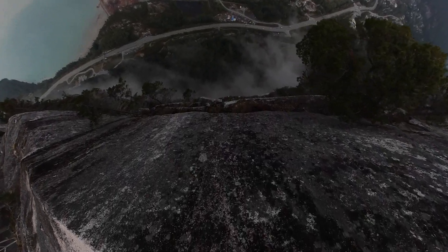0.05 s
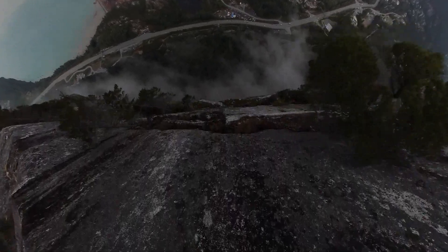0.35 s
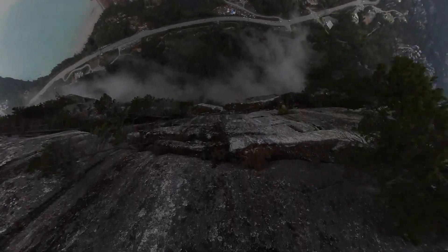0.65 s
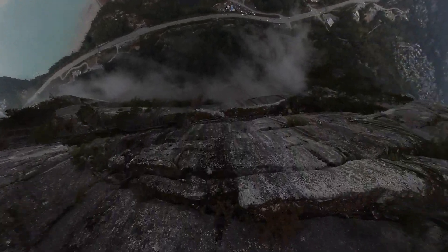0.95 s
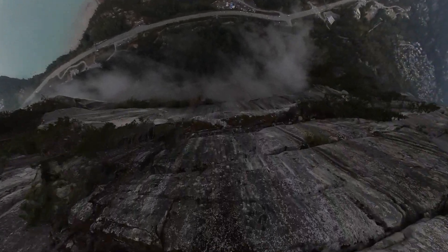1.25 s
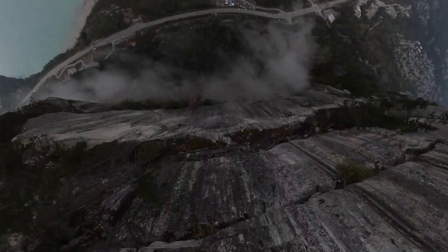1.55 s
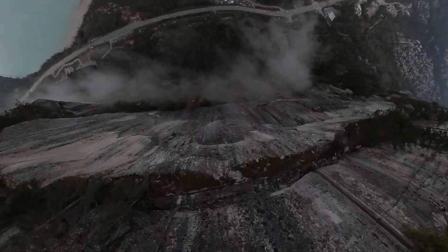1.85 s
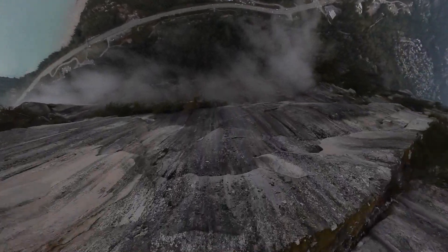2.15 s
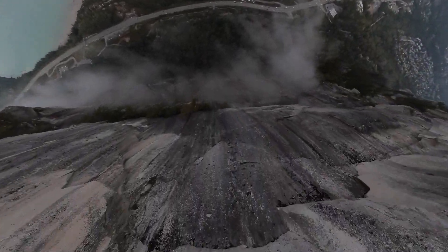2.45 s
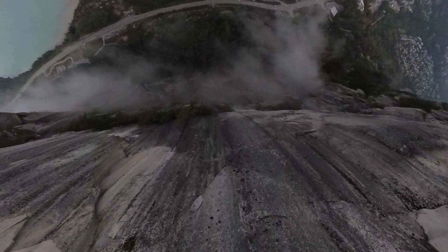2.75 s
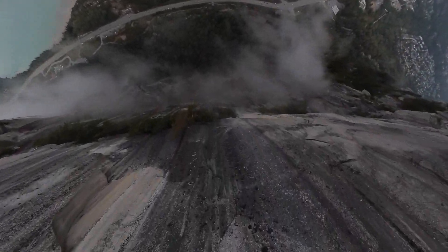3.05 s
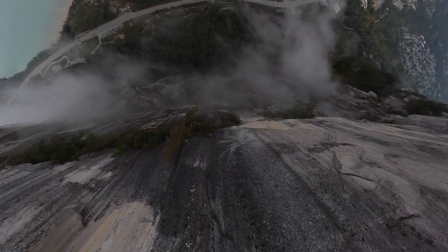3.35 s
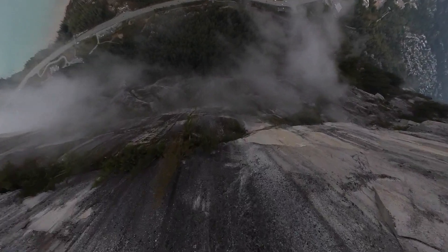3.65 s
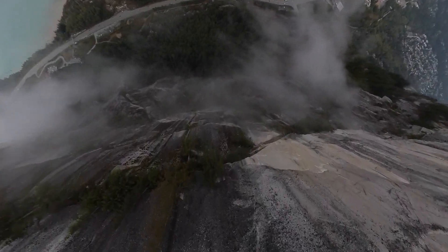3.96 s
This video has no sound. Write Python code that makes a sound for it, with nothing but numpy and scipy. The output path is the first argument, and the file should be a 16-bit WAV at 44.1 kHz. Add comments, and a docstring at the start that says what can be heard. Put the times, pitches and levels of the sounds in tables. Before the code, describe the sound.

Strong wind buffeting the microphone in fast flight down a cliff, with a few early clicks.

```python
"""Wind buffets a camera in fast flight down a cliff: eddies strike the ports, the air rushes and hisses.
Early on the mount knocks and ticks, and one falling swish sweeps by. The camera then folds the wind
to mono, and its limiter presses the rumble flat. Later, eddy shedding adds a wavering drone, the hiss
dies away, and a faint rustle and a rattle of gear lie under the wind."""
import sys
import numpy as np
from scipy import signal
from scipy.fft import rfft, irfft
from scipy.io import wavfile
from scipy.ndimage import uniform_filter1d, minimum_filter1d

SR = 44100
rng = np.random.default_rng(int(sys.argv[2]) if len(sys.argv) > 2 else 0)


def master_out(mix):
    """Clip the mix to full scale and print it as 16-bit PCM to the path in sys.argv[1]."""
    frames = np.transpose(np.atleast_2d(mix))
    ceiling = np.clip(frames, -1, 1)
    pcm = np.round(ceiling * 32767).astype(np.int16)
    wavfile.write(sys.argv[1], SR, pcm)


N = 176400
T = np.arange(N) / SR

# Envelopes of the low buffeting, the rush and the rasp near 1 kHz (time [s], level [dB])
BUFFET_ENVELOPE = [(0, -39), (.03, -33), (.47, -28), (.5, -20), (.61, -27.5), (.77, -14), (.82, -29.5),
                   (.87, -18), (1.05, -20.5), (1.6, -22), (1.93, -25), (2.3, -24.5), (2.6, -23.5),
                   (3.3, -22), (4, -19.5)]
RUSH_ENVELOPE = [(0, -47), (.03, -30.5), (.09, -35.5), (.21, -29), (.25, -35.5), (.29, -34), (.34, -32.5),
                 (.47, -32.5), (.53, -24.5), (.62, -25), (.76, -20.5), (.95, -19), (1.25, -23),
                 (1.6, -29.5), (2.4, -34), (3.1, -32), (3.6, -27.5), (4, -28)]
RASP_ENVELOPE = [(0, -48), (.1, -43.5), (.25, -44.5), (.48, -33), (.55, -35), (.6, -29), (.66, -24.5),
                 (.72, -34), (.78, -30), (.85, -35.5), (1.2, -38.5), (1.6, -40), (2.0, -39), (2.45, -41),
                 (2.48, -48), (2.56, -41.5), (2.8, -45.5), (3.0, -58), (4, -63)]
# Their spectra (frequency [Hz], relative level [dB])
BUFFET_SPECTRUM = [(20, -22), (38, -25.5), (60, -14.5), (90, 1), (125, 3.5), (165, -1), (210, -6.5),
                   (300, -27.5), (600, -54), (1500, -100.5)]
RUSH_SPECTRUM = [(60, -23), (150, -3), (250, 3.5), (350, 0), (500, -4), (750, -11.5), (1000, -20.5),
                 (1500, -35), (2100, -48), (3200, -65.5), (6000, -93), (15000, -85.5)]
RASP_SPECTRUM = [(250, -15), (550, 1.5), (800, 1.5), (1150, -3), (1600, -13.5), (2400, -22), (4000, -44.5),
                 (7000, -61), (10000, -63.5), (12200, -48), (15000, -58)]
# Pitch of the eddy shedding (time [s], frequency [Hz])
DRONE_PITCH = [(1.6, 126), (2.2, 138), (2.46, 141.1), (2.56, 168.3), (2.9, 168), (3.12, 156), (3.25, 164.5),
               (3.45, 138), (3.65, 162), (3.77, 145), (3.95, 175.5)]
# Wind striking one port harder (time [s], left minus right [dB])
SIDEWIND_BALANCE = [(0, 10.5), (.27, 0.5), (.38, 5), (.52, -4.5), (.68, -7.5)]
MONO_S, MONO_FADE_S = .685, .024
DRONE_FROM_S, DRONE_FULL_S = 1.9, 2.7
def wind():
    """Turbulent pressure at the ports makes broadband noise; eddy shedding adds a narrowband drone."""
    eddies = walk(53)  # flutter common to rush and rasp
    buffet = colour(noise(), BUFFET_SPECTRUM)
    pitch_hz = np.interp(T, *np.array(DRONE_PITCH).T) + 3 * walk(8)
    drone = band(pitch_hz, width_hz=23) * undb(1.5 + walk(8))
    build_up = np.interp(T, [DRONE_FROM_S, DRONE_FULL_S], [0, 1])
    rumble = (buffet + build_up * drone) * envelope(BUFFET_ENVELOPE)
    rumble *= undb([[0], [-2.5]])  # weaker in the side signal, so it sounds more centred
    rush = noise() * undb(1.9 * eddies + .6 * walk(22))
    rush = colour(rush, RUSH_SPECTRUM) * envelope(RUSH_ENVELOPE)
    roughness = undb(1.4 * eddies + 3 * walk(370) + .6 * walk(10))
    rasp = colour(noise() * roughness, RASP_SPECTRUM) * envelope(RASP_ENVELOPE)
    stereo = np.interp(T, [MONO_S, MONO_S + MONO_FADE_S], [1, 0])
    balance_db = np.interp(T, *np.array(SIDEWIND_BALANCE).T) * stereo
    return spread(rumble + rush + rasp, stereo * undb(-.5)) * pan(balance_db)


# Single gusts (peak time [s], Gaussian width [s], centre [Hz], bandwidth [Hz], level [dB])
GUST_EVENTS = [(0.515, 0.018, 150, 61.7, -20.5), (0.759, 0.029, 235, 68.6, -17),
               (1.374, 0.2, 79.6, 22, -23)]
def gusts():
    """Surges of wind boom as swells of narrowband noise, in phase at both ports."""
    return sum(band(hz, width_hz) * undb(db) * swell(peak_s, width_s)
               for peak_s, width_s, hz, width_hz, db in GUST_EVENTS)


# Eddy impacts (time [s], level [dB], decay [s], left minus right [dB])
PUFF_EVENTS = [(.034, -26, 0.0098, 12), (.087, -43, 0.0071, 20.5), (.121, -27, 0.012, 6),
               (.174, -18.5, .006, 6.5), (.533, -14.5, 0.0064, -9.5), (2.811, -26.5, 0.0043, 0),
               (3.04, -28, 0.0031, 0), (3.36, -28, 0.0069, 0), (3.577, -28.5, 0.0046, 0),
               (3.674, -25.5, 0.01, 0), (3.867, -29, .008, 5)]
# Their spectrum (frequency [Hz], relative level [dB])
PUFF_SPECTRUM = [(80, -13), (250, 5), (550, -2.5), (850, -11), (1400, -25.5), (2500, -47), (6000, -78)]
def puffs():
    """An eddy hitting a port is a brief pressure pulse, heard as a dull puff."""
    return bursts(PUFF_EVENTS, PUFF_SPECTRUM)


# Envelopes of the hiss, its treble and its side signal (time [s], level [dB])
HISS_ENVELOPE = [(0, -87), (.5, -60.5), (.72, -52), (.88, -46), (1.12, -41), (1.22, -44), (1.33, -41.5),
                 (1.45, -44), (1.75, -40), (1.98, -38.5), (2.12, -40), (2.3, -39.5), (2.458, -40),
                 (2.47, -50), (2.8, -57), (3.0, -74), (3.15, -77.5), (4, -78.5)]
TREBLE_ENVELOPE = [(0, -79), (.55, -71), (.78, -69), (.88, -61), (1.25, -57), (1.33, -53.5), (1.45, -59),
                   (1.7, -54.5), (1.98, -49.5), (2.12, -51), (2.3, -49.5), (2.458, -47), (2.47, -58.5),
                   (2.78, -62), (3.0, -83), (3.15, -88), (4, -88.5)]
HISS_SIDE_ENVELOPE = [(0, -76.5), (.8, -89), (.95, -65.5), (1.5, -61), (1.95, -59), (2.1, -52.5),
                      (2.45, -50.5), (2.5, -59), (2.8, -66), (3.0, -85), (4, -87.5)]
# Their spectra (frequency [Hz], relative level [dB])
HISS_SPECTRUM = [(400, -6), (1000, 0.5), (2000, -4.5), (3600, -6.5), (4700, -11.5), (5500, -22.5),
                 (8000, -36), (16000, -38)]
TREBLE_SPECTRUM = [(2500, -19), (4800, 3.5), (6400, -0.5), (8200, -1.5), (9500, -8.5), (13000, -7),
                   (16000, -12)]
HISS_SIDE_SPECTRUM = [(1500, -73), (2800, -32), (3150, 4), (4200, 2.5), (5200, -7), (7200, -12.5),
                      (8200, -20), (13000, -12.5), (16000, -27.5)]
def hiss():
    """Fine turbulence over the housing makes fluttering noise; only its highs differ between ports."""
    flutter = undb(.3 * walk(9) + .7 * walk(30) + 1.6 * walk(200))
    body, treble, side = noise(channels=3) * flutter
    treble *= undb(1.3 * walk(14))  # the treble also flickers alone
    body = colour(body, HISS_SPECTRUM) * envelope(HISS_ENVELOPE)
    treble = colour(treble, TREBLE_SPECTRUM) * envelope(TREBLE_ENVELOPE)
    side = colour(side, HISS_SIDE_SPECTRUM)
    return spread([body + treble, side], envelope(HISS_SIDE_ENVELOPE))


# Envelope of the swish (time [s], level [dB])
SWISH_ENVELOPE = [(.3, -53), (.335, -44.5), (.37, -26.5), (.398, -18.5), (.425, -24), (.46, -29.5),
                  (.48, -38.5), (.5, -47.5)]
# Spectra of its middle, its side and its treble spray (frequency [Hz], relative level [dB])
SWISH_SPECTRUM = [(200, -58.5), (600, 3.5), (900, 1.5), (1700, 6), (2400, -1.5), (3300, -3), (4200, -12.5),
                  (5000, -21), (8000, -27.5), (16000, -63)]
SWISH_SIDE_SPECTRUM = [(200, 14), (950, -30), (1300, -24), (2000, -16), (2600, 3), (3200, 8), (4200, -3),
                       (5500, -13)]
SPRAY_SPECTRUM = [(2000, -15), (3200, -3), (5000, 5), (7000, -4), (8500, 5.5), (10000, -10), (13000, 4),
                  (16000, 8)]
def swish():
    """A rush of air, roughened by fast amplitude modulation, carries a resonance that falls in pitch."""
    roughness = undb(2 * walk(350))
    middle, side = noise() * roughness
    body = spread([colour(middle, SWISH_SPECTRUM), colour(side, SWISH_SIDE_SPECTRUM)], undb(-7))
    spray = colour(noise() * roughness, SPRAY_SPECTRUM) * undb(-10.5)
    centre_hz = np.interp(T, [.39, .45], [1432, 968])
    resonance = band(centre_hz, width_hz=350) * undb(-18.5) * swell(peak_s=.4433, width_s=.026)
    return (body + spray) * envelope(SWISH_ENVELOPE) + resonance


# Swings of the mount (time [s], level [dB], frequency [Hz], decay [s], left minus right [dB])
KNOCK_EVENTS = [(0.2728, -5, 280, 0.0041, 11), (0.486, -4, 364, 0.003, 3), (0.494, -18.5, 151.6, 0.02, -9)]
def knocks():
    """The mount is a heavily damped oscillator: each dull knock is a decaying sinusoid."""
    out = np.zeros((2, N))
    for start_s, db, hz, decay_s, balance_db in KNOCK_EVENTS:
        attack = 1 - decay(start_s, .0013)
        swing = np.sin(2 * np.pi * hz * (T - start_s)) * decay(start_s, decay_s)
        out += undb(db) * pan(balance_db) * attack * swing
    return out


# Ticks of the mount (time [s], level [dB], decay [s], left minus right [dB])
TICK_EVENTS = [(.272, -45, .003, 13), (.335, -44.5, 0.0025, 24), (.4845, -31.5, .001, 2),
               (.4925, -17, 0.0012, 11), (.506, -34, .002, 2)]
# Their spectrum (frequency [Hz], relative level [dB])
TICK_SPECTRUM = [(1500, -28), (3000, -2), (4000, 2), (5000, -10), (7000, -20), (10500, -9), (12200, 2),
                 (14000, -9), (16000, 4.5)]
def ticks():
    """The mount ticks in short transients, sharp because their energy lies in the treble."""
    return bursts(TICK_EVENTS, TICK_SPECTRUM)


# Crackles of the airflow (time [s], level [dB], decay [s], left minus right [dB])
CRACKLE_EVENTS = [(.268, -23.5, 0.0057, 6.5), (.2755, -23.5, 0.0028, 12), (1.296, -25.5, 0.0024, 0),
                  (1.489, -26, 0.0022, 0)]
# Their spectrum (frequency [Hz], relative level [dB])
CRACKLE_SPECTRUM = [(200, -15.5), (800, 11), (1500, -8), (3200, -4), (4200, -16.5), (5200, -36),
                    (16000, -42)]
def crackles():
    """Impulsive midrange noise in the airflow is heard as separate crackles."""
    return bursts(CRACKLE_EVENTS, CRACKLE_SPECTRUM)


def sizzle():
    """A thin, high noise band swells and fades, flickering by random amplitude modulation."""
    flicker = undb(2.2 * walk(25))
    return band(6200, width_hz=800) * undb(-52) * flicker * swell(peak_s=1.88, width_s=.13)


# Clicks of the gear (time [s], level [dB], decay [s], left minus right [dB])
RATTLE_EVENTS = [(3.451, -64, 0.0011, 1.5), (3.504, -57, 0.00091, -1), (3.536, -59, 0.00097, 0),
                 (3.56, -62.5, 0.00092, -0.5)]
# Their spectrum (frequency [Hz], relative level [dB])
RATTLE_SPECTRUM = [(1500, -12), (3000, 1), (5500, -6), (8000, -12), (12000, -13), (16000, -21)]
def rattle():
    """The gear rattles faintly in an irregular train of quickly damped transients."""
    return bursts(RATTLE_EVENTS, RATTLE_SPECTRUM)


# Spectrum of the rustle (frequency [Hz], relative level [dB])
RUSTLE_SPECTRUM = [(800, -14), (2000, 9), (4000, -1), (6500, -7), (9500, -17), (12500, -13), (16000, -25.5)]
RUSTLE_GRAINS_PER_S, GRAIN_DECAY_S = 260, .0008
def rustle():
    """Shot noise: randomly timed grains merge into a faint crackle, as of fabric in the airstream."""
    onsets = rng.random(N) < RUSTLE_GRAINS_PER_S / SR
    impulses = onsets * undb(2 * rng.standard_normal(N))
    grains = signal.lfilter([1], [1, -np.exp(-1 / (GRAIN_DECAY_S * SR))], impulses)
    crackle = colour(grains * rng.standard_normal(N), RUSTLE_SPECTRUM)
    return crackle * undb(-79) * swell(peak_s=3.7, width_s=.3)


def bursts(events, spectrum):
    """Decaying, panned noise bursts; both ports share one noise after the fold to mono."""
    carrier = spread(noise(), T < MONO_S)
    gain = sum(undb(db) * pan(balance_db) * decay(start_s, decay_s)
               for start_s, db, decay_s, balance_db in events)
    return equalise(carrier * gain, spectrum)


def undb(db):
    """Decibels to amplitude ratio."""
    return 10 ** (np.asarray(db) / 20)


def unit(x):
    """Normalisation to rms 1."""
    return x / np.sqrt(np.mean(x ** 2))


def envelope(points):
    """Gain interpolated in decibels, fading to silence within 0.1 s outside the points."""
    times, db = np.array(points).T
    edge_fade = np.clip(1 + np.minimum(T - times[0], times[-1] - T) * 10, 0, 1)
    return undb(np.interp(T, times, db)) * edge_fade


def decay(start_s, decay_s):
    """Instant attack, exponential decay."""
    return (T >= start_s) * np.exp(-np.maximum(T - start_s, 0) / decay_s)


def swell(peak_s, width_s):
    """Gaussian rise and fall."""
    return np.exp(-.5 * ((T - peak_s) / width_s) ** 2)


def equalise(x, spectrum):
    """Zero-phase filtering that preserves the power of white noise."""
    hz, db = np.array(spectrum).T
    bin_hz = np.maximum(np.arange(N // 2 + 1) * SR / N, 1)
    response = undb(np.interp(np.log(bin_hz), np.log(hz), db))
    return irfft(rfft(x) * unit(response), N)


def colour(x, spectrum):
    """Spectral shaping, normalised to rms 1."""
    return unit(equalise(x, spectrum))


def noise(channels=2):
    """Uncorrelated white noises."""
    return rng.standard_normal((channels, N))


def walk(rate_hz):
    """Low-passed noise: a smooth random fluctuation of rms 1."""
    bin_hz = np.arange(N // 2 + 1) * SR / N
    return unit(irfft(rfft(rng.standard_normal(N)) * np.exp(-(bin_hz / rate_hz) ** 2), N))


def band(hz, width_hz):
    """Narrowband noise by quadrature modulation of a carrier that may glide."""
    phase = 2 * np.pi * np.cumsum(hz * np.ones(N)) / SR
    return unit(walk(width_hz) * np.cos(phase) + walk(width_hz) * np.sin(phase))


def pan(balance_db):
    """Left and right gains for a level difference."""
    return undb(np.array([[.5], [-.5]]) * balance_db)


def spread(pair, side_gain):
    """Left and right as the sum and difference of a middle and a side signal."""
    middle, side = pair
    return middle + np.array([[1], [-1]]) * side_gain * side


def scene():
    """Superposition of the wind and the small sounds within it."""
    clicks = knocks() + crackles() + ticks() + rattle()
    return wind() + gusts() + puffs() + hiss() + swish() + rustle() + sizzle() + clicks


CEILING_START_DB, CEILING_END_DB, CEILING_FROM_S, CEILING_FALL_S = -8, -17, .82, .28
CROSSOVER_HZ, LIMITER_WINDOW_S, TOP_HZ = 1200, .0083, 15700
def record(dry):
    """Peak limiting holds the lows under a sinking ceiling; a steep low-pass then cuts the top."""
    lows = signal.sosfiltfilt(signal.butter(2, CROSSOVER_HZ, fs=SR, output="sos"), dry)
    fall = np.exp(-np.maximum(T - CEILING_FROM_S, 0) / CEILING_FALL_S)
    ceiling = undb(CEILING_END_DB + (CEILING_START_DB - CEILING_END_DB) * fall)
    window = int(LIMITER_WINDOW_S * SR)
    gain = np.minimum(1, ceiling / (np.abs(lows) + 1e-9))
    gain = minimum_filter1d(gain, window)  # hold across each peak
    gain = uniform_filter1d(uniform_filter1d(gain, window // 2), window // 2)
    top_cut = signal.ellip(10, .2, 80, TOP_HZ, fs=SR, output="sos")
    return signal.sosfilt(top_cut, dry - lows + lows * gain)


dry = scene()
out = record(dry)
master_out(out)
```